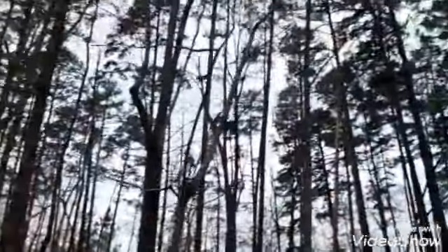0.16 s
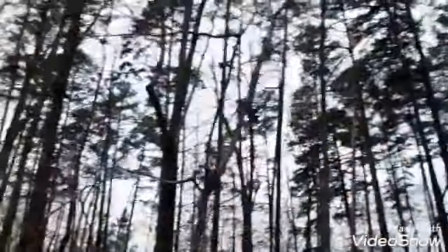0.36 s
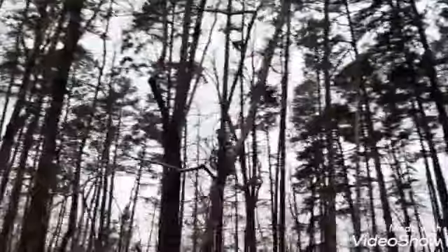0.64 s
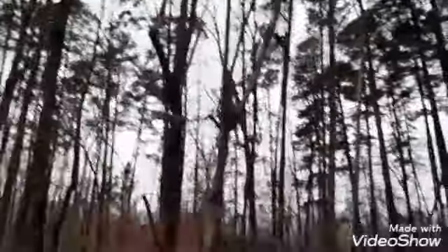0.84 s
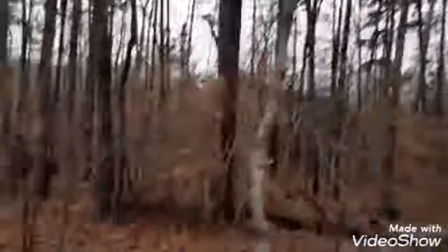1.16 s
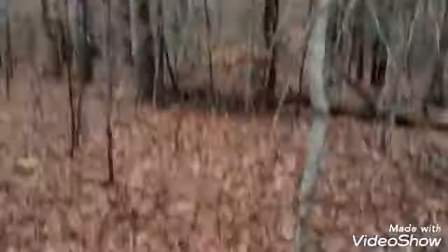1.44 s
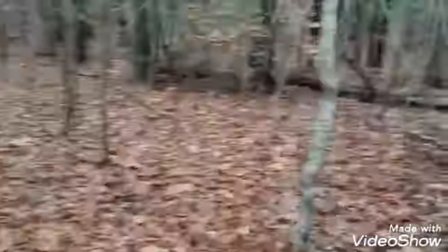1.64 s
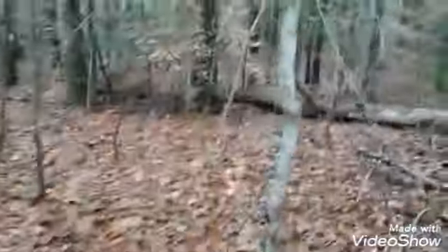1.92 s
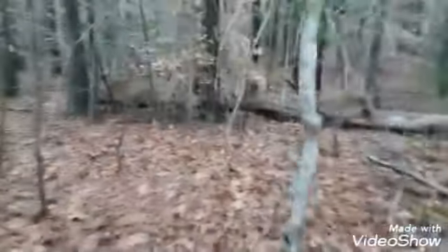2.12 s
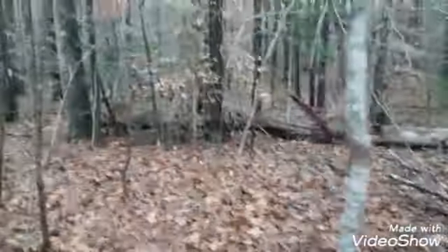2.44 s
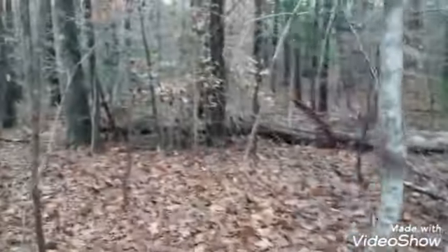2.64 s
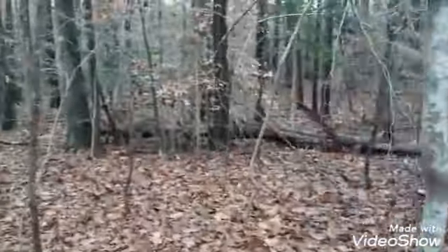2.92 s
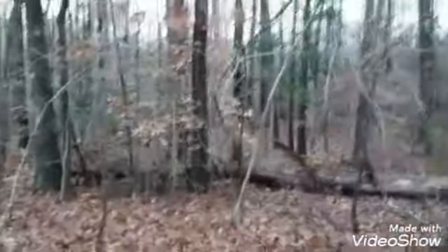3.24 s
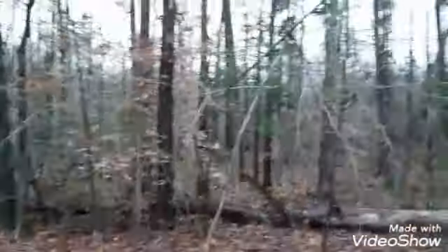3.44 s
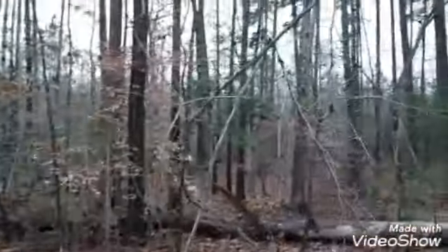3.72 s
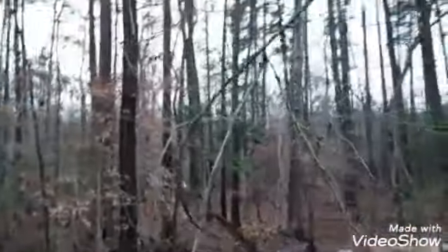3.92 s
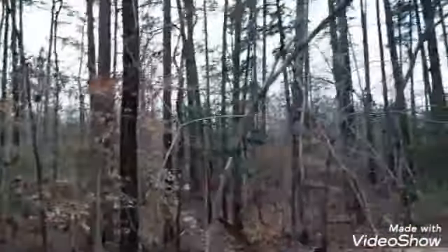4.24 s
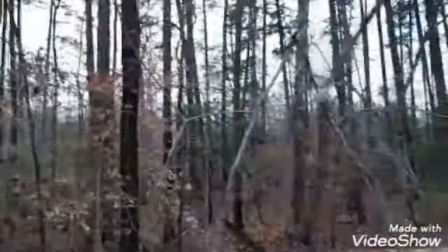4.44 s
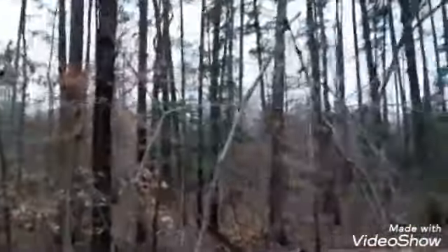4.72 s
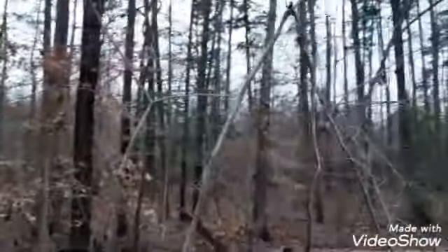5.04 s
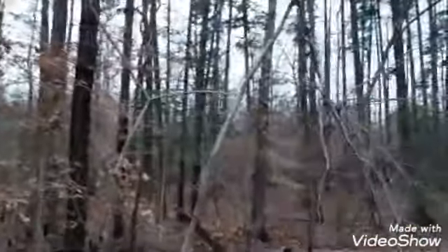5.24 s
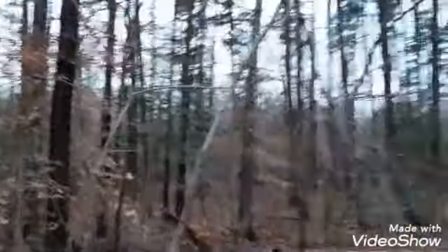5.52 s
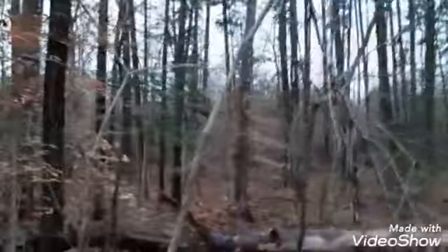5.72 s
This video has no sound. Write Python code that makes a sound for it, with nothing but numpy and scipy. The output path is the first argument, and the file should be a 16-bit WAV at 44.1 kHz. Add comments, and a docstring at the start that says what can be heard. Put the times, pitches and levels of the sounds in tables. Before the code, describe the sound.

Dry leaf litter crackles under shoes, close and crisp with almost no echo. It starts nearly silent, builds to hard crunches and a bright snap before the middle, eases into lighter rustling, then comes a heavy crush and steady shuffling to the end. Soft thuds and swishes of soil sit below; deep lumpy rumble and knocks from the carrying hand lean right in the stereo image.

```python
"""Someone walks through dry fallen leaves in a wood, carrying two microphones in one hand.
A faint rustle grows into crunching presses of the shoe (filtered noise under crackling envelopes);
leaves and twigs snap throughout (ringing noise bursts, a few with short decaying tones), hardest at 2.5 s,
while the soil thuds and swishes (low noise bands). A lumpy rumble (deep noise) and low knocks (decaying tones)
from the carrying hand reach mostly the right microphone. The strongest crush comes near 4.1 s."""
import sys
import numpy as np
from scipy import signal
from scipy.fft import rfft, irfft, next_fast_len
from scipy.io import wavfile

SR = 44100
rng = np.random.default_rng(int(sys.argv[2]) if len(sys.argv) > 2 else 0)


def persist_wave(psi):
    """Save psi, clipped to +-1, as 16-bit WAV."""
    counts = np.round(np.clip(psi, -1, 1) * 32767).astype(np.int16)
    wavfile.write(sys.argv[1], SR, np.atleast_2d(counts).T)


N = 258867  # length [samples]
STEP_S = 0.005  # time step of the swell envelopes [s]


def crushing():
    """Common excitation: each press or drag of a shoe drives swish, crunch, body, crisp and fizz together."""
    # presses and drags of a shoe in the leaves: (peak time [s], rise [s], fall [s], level [dB],
    # soil swish re level [dB], low crunch re level [dB], brightness re level [dB], left minus right [dB])
    crush_events = [(0.0, 0.023, 0.2, -74.5, 2, -0.5, 0.5, -3),
                    (0.211, 0.09, 0.11, -76.5, -3, 5.5, 1, -0.8),
                    (0.281, 0.021, 0.037, -65, -16, 7, -4, -1),
                    (0.332, 0.09, 0.2, -58.5, -13.5, -6, 3.5, 0),
                    (0.451, 0.24, 0.34, -61.5, -14, 1.3, -2, 0.5),
                    (0.558, 0.12, 0.14, -53.5, -3.5, -4.5, -0.8, -4),
                    (0.729, 0.1, 0.15, -65.5, -7, -7, 0.2, -5),
                    (0.848, 0.048, 0.114, -63, -16, -7, -4.5, -6),
                    (0.952, 0.099, 0.087, -61.5, -19, -25, -10, -5),
                    (1.053, 0.14, 0.2, -59.5, -8.5, -3.5, 1.5, 2),
                    (1.136, 0.23, 0.15, -61, 0, -6, -6.8, -4), (1.227, 0.15, 0.08, -50.0, -7, -6, -5, -1.5),
                    (1.307, 0.043, 0.15, -45.5, -12, -7, -3.5, -5),
                    (1.391, 0.071, 0.17, -62.5, 0.5, -9, -2, -2),
                    (1.575, 0.29, 0.2, -62, -7.5, -8, -3.3, -3.5),
                    (1.712, 0.21, 0.094, -52.5, -8.2, -6.5, 0.3, -0.8),
                    (1.864, 0.2, 0.244, -53, -18, -6.5, -4, 0.5),
                    (1.981, 0.15, 0.15, -48, -4, -8, -4.5, -5),
                    (2.1, 0.041, 0.16, -46.5, -3.5, -19, -14, -11),
                    (2.17, 0.04, 0.13, -55, -5, -6.5, -8.5, -3.5),
                    (2.399, 0.12, 0.6, -46.5, -14, -8, -3, 1),
                    (2.517, 0.046, 0.13, -46, -10.5, -2, -8, 0.5),
                    (2.753, 0.239, 0.33, -61, -9, -2, -7.5, -5),
                    (2.974, 0.08, 0.198, -53, -7, -13, -2.0, -6), (3.08, 0.12, 0.1, -59.5, 1, -8, -5, -5),
                    (3.208, 0.078, 0.077, -60, -2, 6.0, -2, -2),
                    (3.348, 0.26, 0.1, -50, -4.5, -6.5, -1.2, -2),
                    (3.453, 0.17, 0.1, -56.5, -12, -3.7, -3, -3),
                    (3.605, 0.11, 0.11, -64.5, -13, -8, -5, -7),
                    (3.723, 0.076, 0.2, -55, -9.5, -11, -6.5, -8),
                    (3.927, 0.111, 0.65, -53, -10.5, -4, -4.5, -0.3),
                    (4.046, 0.095, 0.06, -47.5, -4.5, -8, 1.2, -8),
                    (4.098, 0.079, 0.074, -42.5, -4.5, -5.5, -3, -8),
                    (4.266, 0.04, 0.214, -56.5, -11.5, -14, -4, -8),
                    (4.38, 0.035, 0.18, -53, -23.5, -23, -10.7, -17),
                    (4.451, 0.14, 0.3, -51.5, -12, -7.5, -1, -0.7),
                    (4.643, 0.11, 0.086, -50.5, -6.5, -1.5, -1.5, -4),
                    (4.716, 0.12, 0.18, -51.5, -4.5, -9, -4, -8.5),
                    (4.93, 0.28, 0.41, -49, -9.5, -5, -5.5, -0.1),
                    (5.172, 0.17, 0.14, -51.5, -10, -2.6, -4, 1),
                    (5.317, 0.24, 0.23, -53, -17, -5, -7, 1.5),
                    (5.427, 0.11, 0.27, -49.5, -5, -6, -3.3, -8),
                    (5.487, 0.1, 0.14, -44.6, -12, -10, -1.8, -2),
                    (5.623, 0.073, 0.064, -54, -14, -13, -5, -2),
                    (5.799, 0.19, 0.12, -50, -13, -5.5, -3.5, -0.5)]
    still_db = -104.5  # level left between the swells
    s, rise_s, fall_s, db, swish_db, crunch_db, bright_db, pan_db = np.transpose(crush_events)
    shape = swells(s, rise_s, fall_s)
    body_db = 0
    crisp_db = bright_db - 2.5
    fizz_db = 1.16 * bright_db - 5  # follows brightness more steeply
    layers = [swish_db, crunch_db, body_db, crisp_db, fizz_db]
    return [played(shape, db + layer, pan_db, still_db) for layer in layers]


def leaves(gains):
    """Sum of many fractures: smooth rustle plus crackles, some across all pitches, most in their own range."""
    # colour of the leaf bed: (frequency [Hz], relative spectral density level [dB])
    litter_colour = [(260, -82), (450, -6), (620, -7.5), (850, -5), (1080, -7), (2090, -4), (2690, -7.5),
                     (3620, -7), (5890, -12), (7570, -10), (8300, -13.5), (8910, -15), (13900, -7),
                     (15600, -13.5)]
    # limits of the pitch ranges in crunch, body, crisp and fizz, large leaves to small: (frequencies [Hz])
    size_limits = [(300, 750, 1250), (1250, 1900, 2900, 4600), (4600, 6500, 8700), (8700, 12000, 17000)]
    size = next_fast_len(N)
    hz = np.fft.rfftfreq(size, 1 / SR)
    bed = rfft(noise_pair(size)) * amp(read(litter_colour, hz))
    shared = crackle(per_s=280, spread_db=2.5, t60=0.031)
    out = np.zeros((2, N))
    for edges, gain in zip(size_limits, gains):
        layer = np.zeros((2, N))
        for lo_hz, hi_hz in zip(edges, edges[1:]):
            # power shares of neighbouring ranges complement each other
            share = 1 / (1 + (hz / hi_hz) ** 12) - 1 / (1 + (hz / lo_hz) ** 12)
            own = crackle(per_s=180, spread_db=5.0, t60=0.06)
            rustle = irfft(bed * np.sqrt(share), size)[:, :N]
            layer += rustle * np.sqrt(1 + (1.04 * shared) ** 2 + (0.97 * own) ** 2)
        out += evened(layer) * gain
    return out


def crackle(per_s, spread_db, t60):
    """Shot-noise envelope: random breaks of uneven size, each starting at once and decaying exponentially."""
    size = amp(spread_db * np.minimum(rng.exponential(1, N), 5))
    breaks = size * (rng.random(N) < per_s / SR)
    t = np.arange(2000) / SR
    power_tail = amp(-120 * t / t60)  # a power, so 60 dB down after t60
    power = signal.oaconvolve(breaks ** 2, power_tail)[:N]
    return evened(np.sqrt(abs(power)))


def loud_snaps():
    """Brittle fracture: the loudest breaks of single leaves and twigs, each at its own moment."""
    # loud breaks: (time [s], nominal peak level [dB], ring frequency [Hz], crack re peak [dB],
    # spit re peak [dB], left minus right [dB])
    snap_events = [(0.274, -45, 1000, -16, -12, 4), (0.2906, -49.5, 2080, -7, 5.5, 5),
                   (0.3421, -31.5, 1670, -15, -30, 2), (0.4913, -40, 1510, -9, -9, 7),
                   (0.5148, -31, 1150, -21, -17, 4), (0.5512, -34, 1370, -3, -20, -2),
                   (0.5859, -31, 1170, -13, -31, -2), (0.823, -48, 2120, -4, -6, -8),
                   (0.8292, -37.5, 1980, -17, -20, 3), (0.8656, -49, 1450, -8, -15, 0),
                   (0.9103, -53.5, 1590, 2, 1, -3), (0.9434, -55.5, 1320, 6.5, -12, -9),
                   (0.9542, -45.5, 3700, -1.5, -23, -4), (1.2014, -35, 1470, -24, -29, 1),
                   (1.2252, -31, 2050, -11, -11, -15), (1.2334, -37.5, 2140, -3, -11, -4),
                   (1.275, -29.5, 2090, -4, 1, -11), (1.2935, -26.5, 2400, -11, -17, 2),
                   (1.3057, -27, 3250, 2, -10, -31), (1.3135, -25, 1750, -2.5, -3, -7),
                   (1.3346, -40, 1730, -25, -4, -6), (1.477, -51, 1480, 0.5, -27, -26),
                   (1.533, -55, 2000, 2.5, -11, 5), (1.5597, -33.5, 2010, -24, -21, 2),
                   (1.8776, -30, 1910, -26, -25, 1), (1.921, -27, 1830, -14, -15, -19),
                   (1.9307, -31, 2030, -8, -17, 7), (1.9743, -28.5, 2610, -12, -17, -8),
                   (2.052, -20.5, 1740, -20, -41, -11), (2.0894, -16.5, 2040, -30, -35, -15),
                   (2.1763, -39, 2540, -44, -32, -20), (2.273, -37, 2100, -19, -26, -3),
                   (2.3708, -29, 1970, -25, -27, -2), (2.4695, -43, 1600, -13, -27, 4),
                   (2.502, -13, 2380, -46, -46, 0), (2.5389, -21.5, 2170, -26, -50, -4),
                   (2.567, -23.5, 1580, -22, -33, -5), (2.617, -27, 1880, -8, -7.5, -24),
                   (2.623, -27, 1560, -11, -21, -9), (2.6952, -30, 1800, -33, -32, 2),
                   (2.803, -41.5, 2020, -8, -7, -11), (2.9402, -32, 1930, -12.5, -15.5, -19),
                   (2.9514, -47, 1500, 4, 4, -13), (3.0034, -33.5, 1550, -14, -16, -21),
                   (3.0294, -42, 2250, -2, -11, -3), (3.1905, -32.5, 1790, -16, -23, 0),
                   (3.2792, -26.5, 1820, -25, -30, 2), (3.337, -36, 1450, -0.5, -3.5, -20),
                   (3.3676, -39, 1740, -2, -12, -16), (3.4071, -38.5, 1330, -6.5, -12, -6),
                   (3.461, -35, 1620, -23, -23, -12), (3.5922, -42, 1430, -18, -29, -21),
                   (3.689, -53.5, 1510, 4, -3, -15), (3.7105, -36.5, 1810, -6, -13, -19),
                   (3.7262, -34.5, 1530, -8, -19, -23), (3.771, -52, 2480, -11, -24, 5),
                   (3.895, -28, 2570, -31, -37, 2), (3.9554, -35, 1410, -9, -25, -0.5),
                   (4.028, -32.5, 2500, -1.5, -19, -7), (4.0462, -33.5, 1460, 0, -6.5, -14),
                   (4.084, -36.5, 3500, 3.5, -22, -12), (4.0936, -26, 1470, -5, -4, -7),
                   (4.1144, -20, 1540, -17, -27, -11), (4.1544, -32, 2090, -22, -35, -12),
                   (4.2407, -45, 1700, -3.5, -16, -17), (4.3311, -33, 3440, -17, -24, -7),
                   (4.3565, -44, 2060, 0, -8, -7), (4.375, -45.5, 3150, 2, 1, -9),
                   (4.382, -44.5, 2030, 4, -20, -4), (4.4194, -39, 2040, -14, -7, -4),
                   (4.6379, -33.5, 1450, -5.5, -8, -11), (4.6835, -37, 3150, -5, -10, -1),
                   (4.7126, -29, 3750, -10, -20, -7), (4.7336, -39, 3670, -4.5, -21, -4),
                   (4.7417, -41, 2060, -20, -7, -6), (5.3517, -22, 1560, -14.5, -30, 0),
                   (5.401, -28, 2760, -11, -17, 2), (5.4375, -34.5, 2330, 0, -14, 3),
                   (5.467, -37, 1470, -18, -3, -1), (5.5192, -44, 1670, 6, -19, -1),
                   (5.6868, -36.5, 1760, -14, -32, -22), (5.7167, -39, 3140, -7, -17, -4),
                   (5.7265, -51, 3150, -11, -23, 2), (5.7452, -39, 900, -26, -30, -11),
                   (5.7914, -35, 2110, -16, -27, 11)]
    return snaps(snap_events)


def small_snaps(rustle):
    """Weaker fractures at random moments, their strength following the gain of the rustle."""
    count = 90
    over_db = 11  # highest nominal peak above the rustle [dB]
    when, size, pitch, crack, spit, side = rng.random((count, 6)).T
    s = when * (N - 1) / SR
    rustle_db = 20 * np.log10(rustle.mean(0)[(s * SR).astype(int)])
    peak_db = rustle_db + over_db - 8 * size
    ring_hz = 1100 + 3400 * pitch ** 2
    return snaps(np.c_[s, peak_db, ring_hz, -12 - 14 * crack, -18 - 14 * spit, 4 - 14 * side])


def snaps(rows):
    """Impulsive excitation of damped resonances: a noise burst as ring, dull thock, crisp crack and bright spit."""
    rise_s, low_t60, treble_t60, thock_db = 0.0015, 0.029, 0.023, -29.5
    out, t = np.zeros((2, N)), np.arange(2048) / SR
    rise = 1 - np.exp(-t / rise_s)
    low_tail, high_tail = amp(-60 * t / low_t60), amp(-60 * t / treble_t60)
    blow = 1 + 0.77 * np.exp(-((t - .0014) / 0.00037) ** 2)  # the break itself stands out
    for s, peak_db, hz, crack_db, spit_db, pan_db in rows:
        burst = noise_pair(len(t)) * blow
        ring = 0.28 * evened(resonate(resonate(burst, hz, 0.46 * hz), hz, 3.2 * hz))
        thock = evened(resonate(resonate(burst, 830, 320), 750, 410)) * amp(thock_db)
        crack = 1.29 * evened(resonate(resonate(burst, 5100, 5500), 5760, 6600)) * amp(crack_db)
        spit = 1.2 * evened(resonate(resonate(burst, 11700, 4100), 10300, 7000)) * amp(spit_db)
        snap = rise * ((ring + thock) * low_tail + (crack + spit) * high_tail)
        add(out, s, amp(peak_db) * snap * sides(pan_db)[:, None])
    return out


def feet(dragging):
    """Impact and friction: the soil thuds under the weight and swishes as the shoe drags."""
    # soil thuds: (peak time [s], rise [s], level [dB], left minus right [dB])
    thud_events = [(0.392, 0.078, -58, -16.5), (0.567, 0.046, -53.5, -9), (0.695, 0.048, -64, -26.7),
                   (0.872, 0.1, -62, -24), (1.105, 0.053, -44.5, -36.4), (1.213, 0.085, -47.5, -34),
                   (1.347, 0.059, -48, -12), (1.67, 0.11, -65, -8), (1.943, 0.062, -52.5, -4),
                   (1.99, 0.04, -50, -13), (2.075, 0.046, -40.5, -10), (2.18, 0.028, -54, -20),
                   (2.532, 0.29, -60.5, -25), (2.628, 0.055, -55, -14), (2.689, 0.078, -58.5, -10),
                   (2.992, 0.21, -64, -12), (3.212, 0.045, -66, -21.4), (3.299, 0.05, -58, -12),
                   (3.348, 0.11, -57.5, -9), (3.737, 0.037, -58, -20), (3.803, 0.057, -58.5, -20),
                   (3.913, 0.092, -60.5, -17.7), (4.064, 0.077, -44, -7.0), (4.384, 0.28, -62, -26),
                   (4.49, 0.022, -58.9, -8.3), (4.556, 0.065, -74, -23.2), (4.66, 0.035, -53, -18),
                   (4.737, 0.17, -54.5, -12), (4.987, 0.072, -67, -1), (5.238, 0.21, -65.4, -23),
                   (5.436, 0.11, -52, -7.1), (5.714, 0.04, -69, -12), (5.81, 0.077, -64.5, -7.5)]
    noise = noise_pair(next_fast_len(N))[:, :N]
    soil_db = -87  # level left between the thuds
    thud = evened(band(noise, 119, 211.3) * lumps(20, 3.0)) * jolts(thud_events, soil_db)
    swish = evened(band(noise, 270.4, 552) * lumps(61, 1.5)) * dragging
    return thud + swish


def rumble():
    """Handling noise: bumps of the carrying hand as deep lumpy noise, incoherent between the microphones."""
    # bumps of the carrying hand: (peak time [s], rise [s], level [dB], left minus right [dB])
    bump_events = [(0.406, 0.088, -51, -27), (0.604, 0.12, -55.5, -13), (0.716, 0.058, -52.5, -30),
                   (0.78, 0.026, -68, -15), (0.872, 0.12, -52.5, -31), (0.96, 0.046, -58, -30),
                   (1.04, 0.024, -45, -26), (1.108, 0.12, -42.5, -28), (1.209, 0.081, -38.5, -36),
                   (1.342, 0.063, -41.5, -33), (2.008, 0.14, -46.5, -11.7), (2.363, 0.085, -61.5, -19),
                   (2.549, 0.12, -40, -33), (2.695, 0.067, -66, -24.9), (3.027, 0.16, -59.5, -13),
                   (3.209, 0.15, -57, -23.8), (3.354, 0.093, -57, -20), (3.769, 0.09, -59, -12),
                   (3.968, 0.18, -52.5, -21), (4.072, 0.26, -52.2, -19), (4.356, 0.105, -55, -27.3),
                   (4.504, 0.1, -54, -24), (4.719, 0.14, -52, -20.2), (4.85, 0.183, -55, -22),
                   (5.07, 0.094, -69, -14.6), (5.237, 0.04, -51.5, -28.8), (5.468, 0.062, -61, -6),
                   (5.756, 0.119, -63.7, -16.3), (5.8, 0.04, -55.5, -13)]
    noise = rng.standard_normal((2, N))
    body = band(noise, 36.0, 105) + .5 * evened(resonate(noise, 63.0, 24))
    hand_db = -76  # level left between the bumps
    return evened(body * lumps(28, 4.3)) * jolts(bump_events, hand_db)


def knocks():
    """Damped oscillation: a sudden push rings briefly, low from the carrying hand, high from breaking twigs."""
    # low knocks and short high clicks: (time [s], nominal peak level [dB], ring frequency [Hz],
    # 60 dB decay time [s], left minus right [dB])
    knock_events = [(0.556, -41.5, 150, 0.097, -6), (0.85, -49, 172, 0.091, -26),
                    (0.875, -41, 83.4, 0.027, -19.0), (1.099, -28.5, 84.5, 0.071, -32.5),
                    (1.221, -30, 83.4, 0.058, -22), (1.33, -26, 83.4, 0.027, -30),
                    (1.353, -37, 94, 0.051, -23), (1.92, -37, 143, 0.047, -18),
                    (2.052, -25, 165, 0.057, -22), (2.088, -22, 178, 0.026, -22),
                    (2.402, -48, 403, 0.045, -6), (2.502, -33, 700, 0.016, -5),
                    (2.689, -34, 72.5, 0.046, -27), (3.202, -44, 99, 0.044, -26),
                    (3.344, -44.5, 222, 0.14, -6), (3.624, -57.5, 151, 0.06, -14),
                    (3.733, -48.5, 158, 0.067, -11.5), (3.913, -45, 72.7, 0.055, -17),
                    (4.057, -32, 141, 0.05, -6.0), (4.087, -32, 196, 0.039, -2),
                    (4.5, -47.5, 136, 0.06, -6), (4.639, -48, 147, 0.06, -10),
                    (4.726, -28.5, 126, 0.026, -33), (5.352, -30.5, 1090, 0.011, -1),
                    (5.41, -42, 196, 0.029, -6), (5.709, -57.5, 193, 0.16, -9.0),
                    (5.745, -43, 840, 0.018, 2)]
    out, t = np.zeros((2, N)), np.arange(6000) / SR
    for s, peak_db, hz, t60, pan_db in knock_events:
        turns = hz * (t + 0.00088 * (1 - np.exp(-t / 0.00082)))  # the first swing is quicker
        decay = amp(-60 * t / t60) + 0.12 * np.exp(-t / 0.00073)
        push = -np.sin(2 * np.pi * turns) * decay
        add(out, s, amp(peak_db) * push * sides(pan_db)[:, None])
    return out


def jolts(table, rest_db):
    """Asymmetric envelope: gain over time of short swells that take twice as long to fall as to rise."""
    s, rise_s, db, pan_db = np.transpose(table)
    return played(swells(s, rise_s, 2 * rise_s), db, pan_db, rest_db)


def swells(peak_s, rise_s, fall_s):
    """Attack and decay: gain of each event (events x time steps), up to a rounded top and down again."""
    edge_db, rounding = -27.5, 1.33  # level one rise or fall time from the top; exponent of the top
    ahead = np.arange(0, N / SR + STEP_S, STEP_S) - peak_s[:, None]
    part = np.where(ahead < 0, -ahead / abs(rise_s[:, None]), ahead / abs(fall_s[:, None]))
    return amp(edge_db * part ** rounding)


def played(shape, level_db, pan_db, rest_db):
    """Incoherent summation: adds the powers of all events and of the rest between, for both microphones."""
    event_power = (sides(pan_db) * amp(level_db)) ** 2 @ shape ** 2
    power = event_power + 2 * amp(rest_db) ** 2
    t = np.arange(N) / SR
    return np.array([np.interp(t, np.arange(len(p)) * STEP_S, np.sqrt(p)) for p in power])


def noise_pair(size):
    """Spatial coherence: white noise at both microphones, most alike where the waves are long."""
    # likeness of the two microphones: (frequency [Hz], left-right correlation [1])
    likeness = [(60, 0.95), (150, 0.63), (380, 0.84), (950, 0.2), (2380, 0.12), (5980, 0.17),
                (15000, -0.18)]
    lag = 6  # samples by which the left microphone leads
    a, b = rfft(rng.standard_normal((2, size)))
    hz = np.fft.rfftfreq(size, 1 / SR)
    same = np.clip(read(likeness, hz), -1, 1)
    right = same * a + np.sqrt(1 - same ** 2) * b
    delay = np.exp(-2j * np.pi * hz * lag / SR)
    return irfft([a, right * delay], size)


def resonate(x, hz, width):
    """Resonance by heterodyning: shifts hz down to zero, smooths, and shifts back with gain 1 at hz."""
    turn = np.exp(2j * np.pi * np.cumsum(hz * np.ones(x.shape[-1])) / SR)
    r = np.exp(-np.pi * width / SR)
    return 2 * (turn * signal.lfilter([1 - r], [1, -r], x / turn)).real


def band(x, lo_hz, hi_hz):
    """Band limitation: steep band-pass, scaled to rms 1."""
    return evened(signal.sosfilt(signal.butter(3, [lo_hz, hi_hz], "band", fs=SR, output="sos"), x))


def lumps(cutoff_hz, depth_db):
    """Amplitude modulation by low-passed noise: a gain that wanders by depth_db rms."""
    wander = signal.lfilter(*signal.butter(2, cutoff_hz, fs=SR), rng.standard_normal(N))
    return amp(depth_db * evened(wander))


def sides(pan_db):
    """Level difference at constant power: gains of two unrelated signals whose mean has power 1."""
    left = amp(pan_db)
    return 2 * np.array([left, np.ones_like(left)]) / np.sqrt(1 + left ** 2)


def amp(db):
    """Logarithmic level: decibels to amplitude gain."""
    return 10 ** (np.asarray(db) / 20)


def evened(x):
    """Effective value: scales to rms 1."""
    return x / np.sqrt(np.mean(x ** 2) + 1e-20)


def read(points, hz):
    """Logarithmic frequency scale: interpolates a spectrum table along it."""
    f, value = np.transpose(points)
    return np.interp(np.log(hz + 1), np.log(f + 1), value)


def add(mix, s, sound):
    """Superposition: mixes a two-channel sound in at time s [s]."""
    part = mix[:, round(s * SR):][:, :sound.shape[1]]
    part += sound[:, :part.shape[1]]


def scene():
    """Superposition of all sources at the two microphones."""
    swish, crunch, body, crisp, fizz = crushing()
    ground = leaves([crunch, body, crisp, fizz]) + feet(swish)
    breaks = loud_snaps() + small_snaps(body)
    return ground + breaks + rumble() + knocks()


def record(dry):
    """Cavity resonance: each microphone cavity adds narrow bands; then bass cut and treble limit."""
    # microphone cavities: (frequency [Hz], width [Hz], left level [dB], right level [dB])
    cavities = [(1479, 20, -23, 3.5), (2068, 26, 5, -33), (4730, 390, -38.5, -22.5)]
    x = dry.copy()
    for hz, width, left_db, right_db in cavities:
        x += amp([[left_db], [right_db]]) * resonate(dry, hz, width)
    x = signal.sosfilt(signal.butter(3, 45, "high", fs=SR, output="sos"), x)
    treble_limit = signal.firwin(511, 16100, window=("kaiser", 9), fs=SR)
    return signal.oaconvolve(x, treble_limit[None], "same")


dry = scene()
out = record(dry)
persist_wave(out)
```